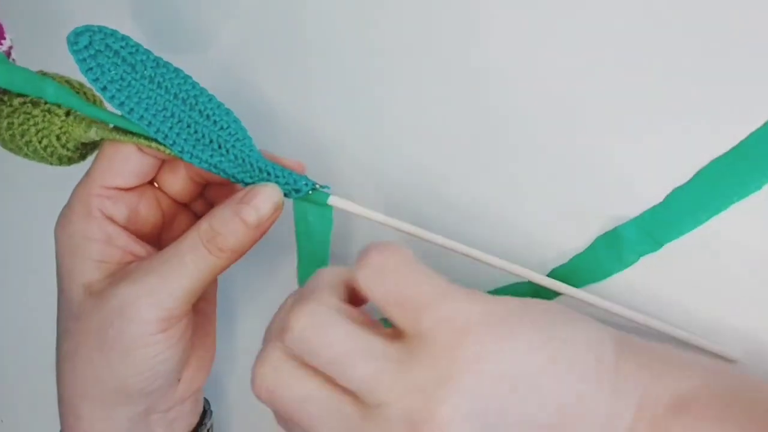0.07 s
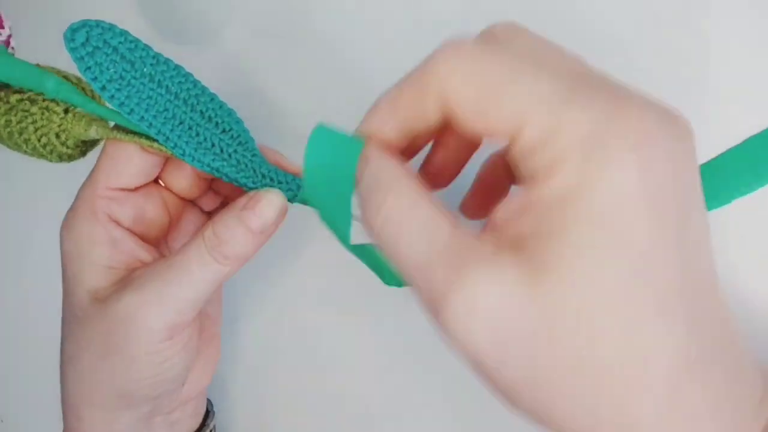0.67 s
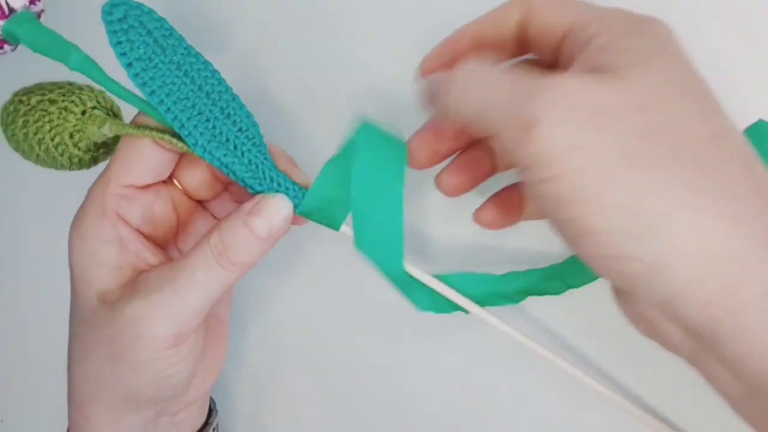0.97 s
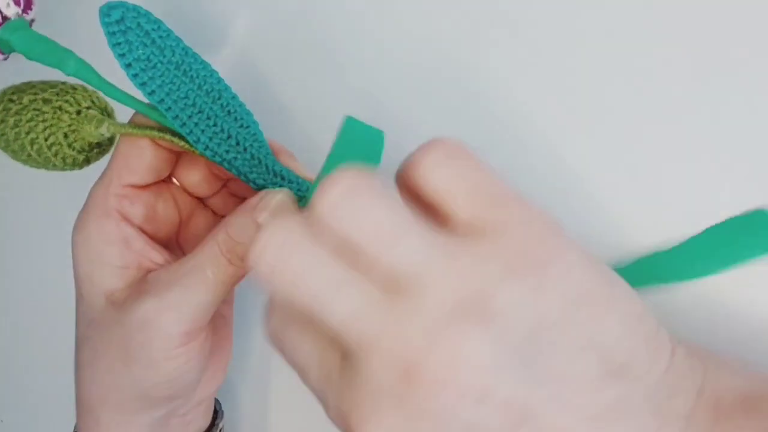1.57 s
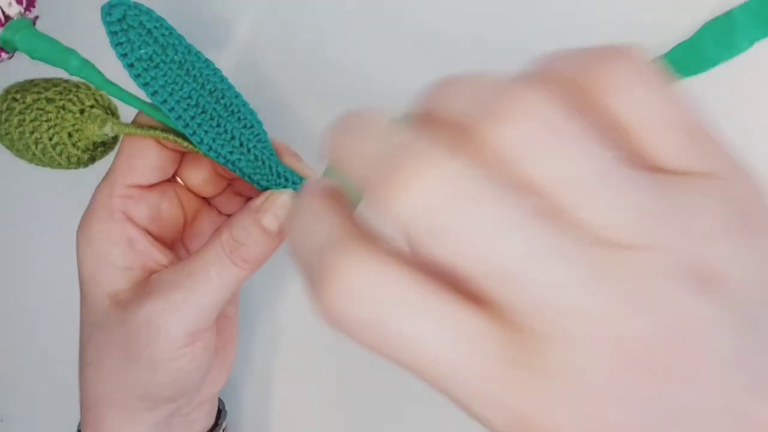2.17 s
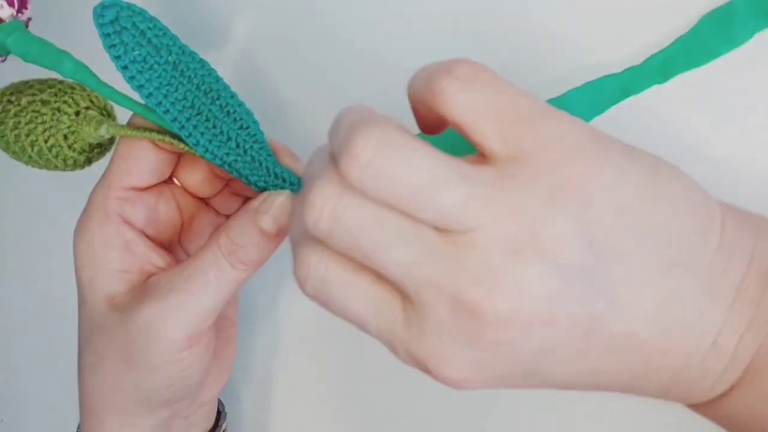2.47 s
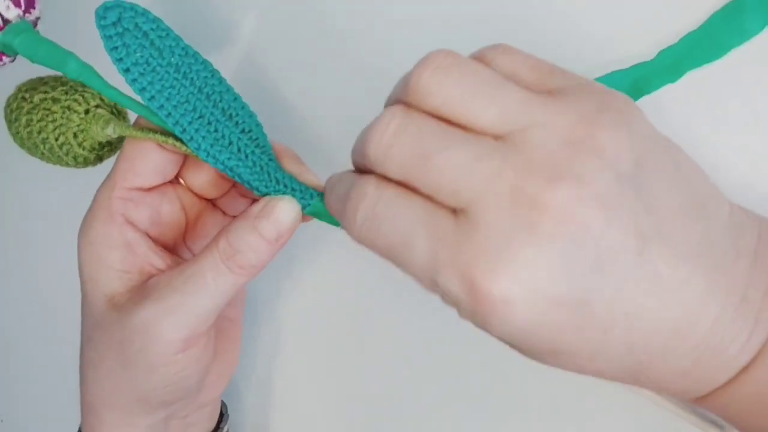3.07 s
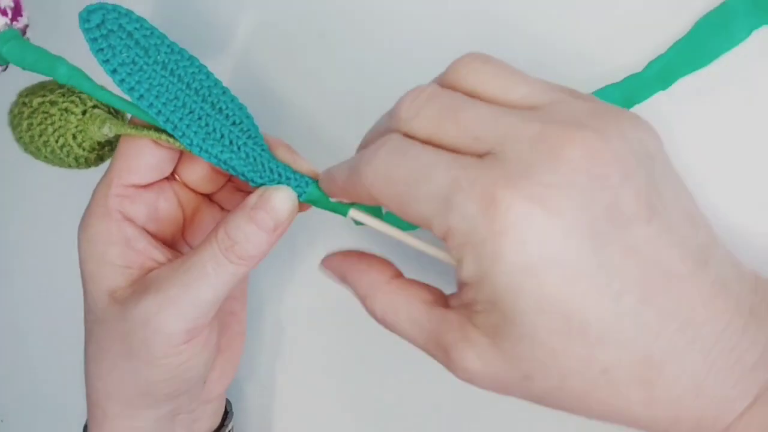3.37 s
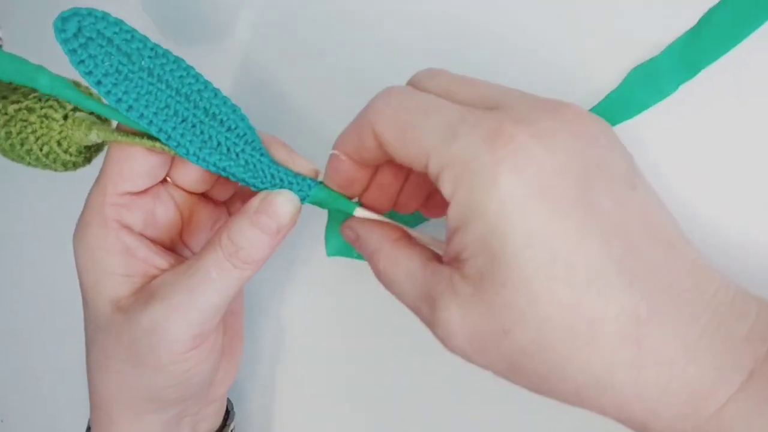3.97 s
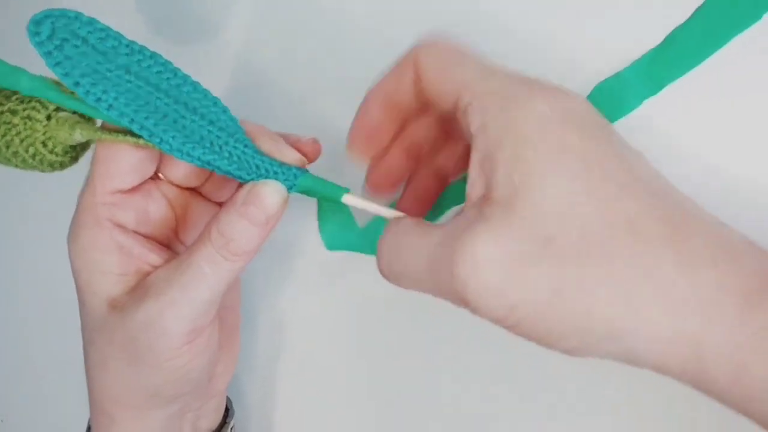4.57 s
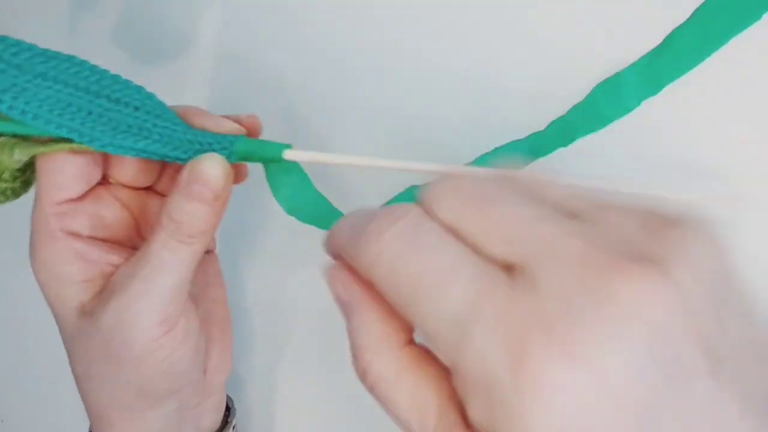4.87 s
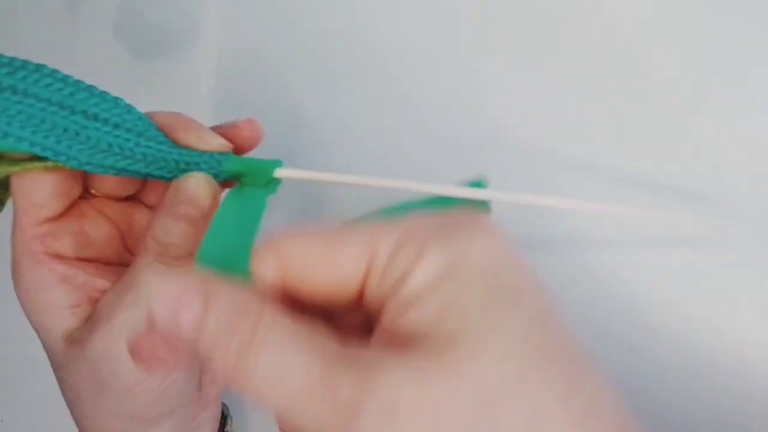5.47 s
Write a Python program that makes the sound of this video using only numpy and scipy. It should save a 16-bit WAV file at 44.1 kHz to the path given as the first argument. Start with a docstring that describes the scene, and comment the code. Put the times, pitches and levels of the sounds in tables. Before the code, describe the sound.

In a small room with a faint low hum, thin plastic tape crinkles in uneven bursts close to the microphone as it is wrapped around a stick. Scattered ticks build to a cluster of sharp snaps, then ease into gentler rustling, a soft hush of rubbing fingertips and dull hand shuffles. Finally the tape hangs loose and gives a busy, louder run of papery crackles and snaps.

```python
"""A small room, quietly rumbling and humming; a two-port microphone above a table.
Close to it, hands stretch thin plastic tape and wind it round a stick. Each short pull sets tiny
wrinkles crackling, creases buckle with sharp snaps, the edge skids off a finger, and fingertips rub
the tape smooth. Near the end the tape hangs free and its loose length rings like paper.
The walls answer briefly."""
import sys
import numpy as np
from scipy import signal
from scipy.fft import rfft, irfft, next_fast_len
from scipy.io import wavfile
from scipy.ndimage import uniform_filter1d, map_coordinates

SR = 44100
rng = np.random.default_rng(int(sys.argv[2]) if len(sys.argv) > 2 else 0)


def to_wav(s):
    """Save 16-bit WAV."""
    ch = np.atleast_2d(s).T  # columns
    pcm = np.round(np.clip(ch, -1, 1) * 32767)  # PCM
    wavfile.write(sys.argv[1], SR, pcm.astype(np.int16))


N = 246959

# hard or lone creases buckling: t/s, level/dB, body re level/dB, left-right/dB
SNAPS = [(0.003, -29, 2.5, 1), (0.321, -50.5, -18, -13), (0.6625, -21, -7.5, -12.5), (0.6667, -23, -5, -2),
         (0.794, -38, -10, -1), (0.8694, -34.5, -10, -5), (1.2768, -27.5, -8, -3), (1.313, -22, -27, 11),
         (1.3209, -20, -20, -1), (1.3262, -22, -32, -3), (1.3614, -17.5, -20, 10), (1.3826, -30, -9, 5),
         (1.429, -29, -19, 7), (1.5308, -14.5, -18, -20), (1.5341, -11.5, -17.5, -7.5),
         (1.5353, -9, -16, -6), (1.5379, -20, -11, -9), (1.9367, -40.5, -17, -9), (2.334, -32, -22, -8),
         (2.3729, -36, 5.5, -7), (2.934, -30, -29, 2), (3.481, -45, -6, -16), (3.7777, -40, -14, -16),
         (3.8382, -35.5, -17, -1), (4.311, -26, -16, -6), (4.4175, -38.5, -17, 1),
         (4.6058, -34.5, -2.5, 23), (4.9116, -36.5, -12, -4), (4.949, -23, -28, 15), (4.969, -24, -11, -2),
         (4.9949, -16.5, -9, -12.5), (5.006, -19, -23, -2), (5.016, -18.5, -10.5, -4),
         (5.0724, -29, -1.5, -15), (5.135, -28.5, -12.5, -12), (5.2875, -25.5, -22, 1),
         (5.3033, -26, -12, -5), (5.3111, -20.5, -16, -8), (5.3253, -14, -31, -1),
         (5.3382, -17.5, -6.5, -2), (5.3498, -19, -18, -12), (5.3616, -16, -22, 6), (5.367, -17, -14, -16),
         (5.3767, -22, -30, -20), (5.3897, -16, -16, -4), (5.4713, -26, -26, -9), (5.497, -15, -9, 13),
         (5.5149, -14.5, -17.5, -11), (5.5683, -17.5, -8, -5), (5.573, -9.5, -10.5, -8),
         (5.5809, -20, -5.5, 4), (5.5902, -17, -13, 1)]
# spectral shape of the taut film: f/Hz, level/dB
FILM_SPECTRUM = [(400, -13.5), (1600, -17.5), (2300, -9.5), (3600, -11.5), (4700, -6), (6000, -2),
                 (8500, -1), (10300, -11), (12300, -13), (15000, -22.5)]


def amp(db):
    return 10 ** (np.asarray(db) / 20)


def unit(x):
    return x / np.sqrt(np.mean(x ** 2) + 1e-20)


def pan(left_right_db):
    return amp(left_right_db * np.array([[.5], [-.5]]))


def along(points, hz):
    """Interpolate (f/Hz, value) points on a log axis."""
    f, v = np.transpose(points)
    return np.interp(np.log(hz + 1), np.log(f + 1), v)


def curves(rows):
    """One value per sample for each column after t/s."""
    s, *columns = np.transpose(rows)
    return np.array([np.interp(np.arange(N) / SR, s, column) for column in columns])


def wobble(knots_per_s):
    """Smooth random curve."""
    knots = rng.standard_normal(int(N * knots_per_s / SR) + 4)
    return map_coordinates(knots, [np.arange(N) * knots_per_s / SR])


def resonance(hz, centre_hz, width_hz):
    return 1j * hz * width_hz / (centre_hz ** 2 - hz ** 2 + 1j * hz * width_hz)


def filtered(x, response):
    """Apply the complex gain response(f/Hz)."""
    m = next_fast_len(N + SR // 2)
    return irfft(rfft(x, m) * response(np.fft.rfftfreq(m, 1 / SR)), m)[..., :N]


def coloured(x, spectrum, size=2048):
    """Causal unit-energy filter: a spectrum as the two resonant ports hear it."""
    # cavity behind each port, left then right: f/Hz, width/Hz, added peak/dB
    ports = [(8920, 1900, 3), (7380, 1230, 8.5)]
    hz = np.fft.rfftfreq(size, 1 / SR)
    cavity = np.array([1 + amp(db) / (1 + (2 * (hz - f) / width) ** 2) for f, width, db in ports])
    cepstrum = irfft(np.log(amp(along(spectrum, hz)) * cavity))
    cepstrum[:, 1:size // 2] *= 2  # fold to minimum phase
    cepstrum[:, size // 2 + 1:] = 0
    impulse = unit(irfft(np.exp(rfft(cepstrum)))) / np.sqrt(size)
    return signal.fftconvolve(np.broadcast_to(x, (2, N)), impulse, axes=1)[:, :N]


def hum_tone(centre_hz, drift_hz, flicker_db):
    """A sine wavering in level and pitch."""
    flicker = amp(flicker_db * wobble(14))
    hz = centre_hz + drift_hz * wobble(14)
    return unit(flicker * np.sin(2 * np.pi * np.cumsum(hz) / SR))


def background(rumble_db, lower_db, upper_db):
    """Room rumble and two hum tones about an octave apart, stronger on the left."""
    # rumble spectrum: f/Hz, level/dB
    rumble_spectrum = [(15, -1), (27, 5), (38, -8.5), (80, -8), (125, -10), (175, -2.5), (300, -12),
                       (550, -14), (1200, -24.5), (2700, -32.5), (5300, -38.5), (8000, -32), (11000, -48),
                       (15000, -68.5)]
    # likeness of the sides: f/Hz, correlation (capped at 1)
    likeness = [(60, 0.9), (130, 1.5), (300, 0.5), (700, 0), (1500, 0)]
    # balance: f/Hz, left-right/dB
    balance = [(200, 6), (600, 7), (2000, -0.5), (10000, -1.5)]
    # hum: t/s, lower tone/dB, upper tone/dB
    hum_levels = [(0.0, -50, -51), (0.6, -53, -45.5), (1.5, -49.5, -55), (3.0, -51, -55.5),
                  (3.6, -43.5, -53.5), (4.95, -45, -51), (5.6, -57, -57.5)]

    def mid_side(hz):
        angle = np.arccos(np.clip(along(likeness, hz), -1, 1)) / 2
        return amp(along(rumble_spectrum, hz)) * [np.cos(angle), np.sin(angle)]

    mid, side = filtered(rng.standard_normal((2, N)), mid_side)
    rumble = amp(rumble_db) * unit(np.array([mid + side, mid - side]))
    lower, upper = curves(hum_levels)
    hum = amp(lower + lower_db) * hum_tone(centre_hz=53.0, drift_hz=3.5, flicker_db=4.5)
    hum += amp(upper + upper_db) * hum_tone(centre_hz=109.8, drift_hz=6, flicker_db=4)
    return filtered(rumble + hum, lambda hz: pan(along(balance, hz)))


def room(x, onset_s=0.0022):
    """The walls answer a few milliseconds late; each frequency dies at its own rate."""
    # reverberation: f/Hz, t60/s
    decay = [(300, 0.44), (1300, 0.08), (3500, 0.29), (9000, 0.22), (15000, 0.425)]
    hz, t, noise = signal.stft(rng.standard_normal((2, SR // 2)), SR, nperseg=256)
    envelope = amp(-60 * t / along(decay, hz)[:, None]) * (1 - np.exp(-t / onset_s))
    tail = signal.istft(noise * envelope, SR, nperseg=256)[1]
    return signal.fftconvolve(x, tail / np.linalg.norm(tail[0]), axes=1)[:, :N]


def fingers(rub_db, uneven_db, grip_db, holding_db, swell_s=0.018):
    """Fingertips rub the wound tape with an uneven hush; the hands shuffle dully, more at each grip."""
    # fingertips pressing along the stick: t/s, level/dB
    rub_levels = [(2.85, -80), (2.95, -60), (3.04, -53), (3.12, -50), (3.22, -53), (3.35, -58), (3.6, -62),
                  (4.0, -66), (4.5, -80)]
    # soft rubbing hush: f/Hz, level/dB
    hush_spectrum = [(300, -11), (500, 6), (1000, -2), (1600, -2), (2500, 2), (3600, -7.5), (5500, -3),
                     (8500, -12), (11000, -46), (15000, -45)]
    # grip shifts: t/s, level/dB
    grips = [(0.0, -37), (0.238, -48), (1.56, -53), (1.71, -42), (1.96, -39.5), (2.39, -40), (4.23, -37.5),
             (4.41, -44), (5.01, -38.5), (5.13, -38), (5.35, -38.5), (5.51, -40), (5.585, -42)]
    # shuffling palms: f/Hz, level/dB
    palm_spectrum = [(60, -22.5), (170, 3.5), (280, -1.5), (520, -7.5), (900, -24), (2000, -28.5),
                     (6000, -66.5)]
    t = np.arange(N) / SR
    rub = coloured(rng.standard_normal((2, N)), hush_spectrum)
    rub *= amp(curves(rub_levels) + rub_db + uneven_db * wobble(25.16))
    shuffle = amp(holding_db) + sum(amp(db) * np.exp(-np.abs(t - s) / swell_s) for s, db in grips)
    grip = coloured(rng.standard_normal(N), palm_spectrum) * shuffle * amp(grip_db) * pan(4)
    return rub + grip


def loose_length(tape, free_s, centre_hz, width_hz, gain_db):
    """Once the tape hangs free, its sounds also ring one resonance of the loose length."""
    free = np.clip((np.arange(N) / SR - free_s) / .02, 0, 1)
    return amp(gain_db) * filtered(tape * free, lambda hz: resonance(hz, centre_hz, width_hz))


def skids(rough_db, rise_s=0.0077):
    """The tape's edge catches, then slips off a finger with a short rasp."""
    # slips: t/s, level/dB, t60/s
    slips = [(0.663, -50, 0.045), (0.868, -49, 0.42), (1.275, -39, 0.49), (1.697, -43, 0.082),
             (2.55, -31, 0.11), (4.601, -32, 0.057)]
    # rasping edge: f/Hz, level/dB
    edge_spectrum = [(1200, -26), (2300, -34.5), (2800, 4.5), (4000, -3), (6300, 0), (8000, -12.5),
                     (11000, -22), (15000, -30.5)]
    t = np.arange(N) / SR
    envelope = sum(amp(db - 60 * np.abs(t - s) / t60) * np.clip((t - s) / rise_s, 0, 1)
                   for s, db, t60 in slips)
    rasp = unit(rng.standard_normal((2, N)) * amp(rough_db * wobble(500)))
    return coloured(envelope * rasp, edge_spectrum)


def pulling(settle_db_per_s):
    """Envelopes of bright crackle and deeper rustle: each pull speeds up, runs on and lets go."""
    # pulls: t/s, rise/s, hold/s, crackle/dB, rustle re crackle/dB
    pulls = [(0.0, 0.001, 0.005, -33.5, -3.5), (0.31, 0.012, 0.11, -61, -2), (0.446, 0.13, .04, -46.5, -12),
             (0.658, 0.0021, 0.007, -26, -19), (0.727, 0.012, 0.0049, -44, -20),
             (0.863, 0.0058, 0.078, -43, -8), (1.111, 0.0089, 0.024, -51.5, -4),
             (1.17, 0.023, 0.02, -44, -2.5), (1.272, 0.0054, 0.091, -29, -12),
             (1.415, 0.032, 0.054, -37.5, -18), (1.52, 0.0058, 0.074, -39, -6),
             (1.693, 0.0093, 0.0077, -32, -5), (1.825, 0.0041, 0.016, -48, -12),
             (1.945, 0.0056, 0.039, -54.5, 0.5), (2.261, 0.088, 0.014, -32.5, -9.5),
             (2.455, 0.015, 0.0034, -55.5, 6.5), (2.549, .005, 0.014, -40, -16),
             (2.648, 0.018, 0.072, -53, -4), (2.901, 0.095, 0.01, -38, -14), (3.012, 0.017, 0.13, -63, 14),
             (3.243, 0.12, .05, -47, -8), (3.476, 0.012, 0.0067, -40, -10), (3.53, 0.1, .07, -51, -14),
             (3.681, 0.023, 0.0084, -44, -25), (3.77, .005, 0.13, -50, -6), (3.97, 0.043, .08, -48.5, -6),
             (4.183, 0.024, .01, -48, -6.5), (4.309, 0.0061, 0.011, -39.5, -6.5),
             (4.4, .008, .015, -47.5, -7), (4.538, 0.071, 0.0091, -43, -8), (4.921, 0.011, 0.016, -24, -19),
             (4.996, 0.0046, 0.055, -29, -2.5), (5.104, 0.044, 0.012, -34.5, -13),
             (5.269, 0.068, 0.051, -24, -9), (5.464, 0.0062, 0.037, -30.5, -25),
             (5.563, 0.0044, .04, -17, -16)]
    t = np.arange(N) / SR
    taut, slack = np.full((2, N), 1e-5)
    for s, rise_s, hold_s, db, rustle_db in pulls:
        span = slice(max(int(s * SR), 0), int((s + 1) * SR))
        age_s = t[span] - s
        settling_s = np.maximum(age_s - rise_s - hold_s, 0)
        stroke = np.clip(age_s / rise_s, 0, 1) * amp(db - settle_db_per_s * settling_s)
        taut[span] = np.hypot(taut[span], stroke)
        slack[span] = np.hypot(slack[span], stroke * amp(rustle_db))
    return taut, slack


def sticking(hard_db=-22, run_gap_s=.04, dip_db=-11, lead_s=.008):
    """Sliding gain: the tape sticks and goes quiet just before a run of hard creases gives way."""
    t = np.arange(N) / SR
    hard_s = np.sort([s for s, db, *_ in SNAPS if db > hard_db])
    starts_s = hard_s[np.diff(hard_s, prepend=-1) > run_gap_s]
    wait_s = np.append(starts_s, np.inf)[np.searchsorted(starts_s, t)] - t
    return amp(dip_db * np.exp(-wait_s / lead_s))


def flexing(x, depth_db, bins, frames):
    """The film's resonances wander as it bends: random patches of gain in frequency and time."""
    spectra = signal.stft(x, nperseg=512)[2]
    patches = uniform_filter1d(rng.standard_normal(spectra.shape[1:]), bins, axis=0)
    patches = uniform_filter1d(patches, frames, axis=1)
    return unit(signal.istft(spectra * amp(depth_db * unit(patches)), nperseg=512)[1][:, :N])


def buckle(t, life_s, echo_s, echo_db, flutter_db, flutter_t60_s):
    """One crease gives way: a short burst, its echo off the table and the flutter of loose film."""
    burst = np.exp(-t / life_s)
    echo = amp(echo_db) * (t > echo_s) * np.exp(-np.abs(t - echo_s) / life_s)
    flutter = amp(flutter_db - 60 * t / flutter_t60_s)
    envelope = np.sqrt(burst ** 2 + echo ** 2 + flutter ** 2)
    return unit(rng.standard_normal((2, len(t))) * envelope) * np.sqrt(np.mean(envelope ** 2))


def crackle(taut, slack, crackle_db, rustle_db, flicks_per_s, spread_db, pan_db):
    """Tiny wrinkles flick at random over a soft hiss as the tape slides; slack tape rustles lower."""
    # slack tape: f/Hz, level/dB
    slack_spectrum = [(250, -20), (500, -14), (750, -0.5), (1020, 2), (1500, -9), (2050, -2.5),
                      (2550, -10.5), (3100, -5.5), (3700, -2.5), (4700, -1.5), (7000, -6), (12000, -35.5)]
    t = np.arange(SR // 50) / SR
    hits = rng.random((4, N)) < flicks_per_s / SR / 4
    flicks = hits * amp(spread_db * np.minimum(rng.exponential(size=(4, N)), 3))
    wrinkles = np.zeros((2, N))
    for train in flicks:
        click = buckle(t, life_s=0.00073, echo_s=rng.uniform(0.0012, 0.0043), echo_db=-5,
                       flutter_db=-26.5, flutter_t60_s=0.018)
        wrinkles += signal.fftconvolve(train[None], click, axes=1)[:, :N]
    hiss = rng.standard_normal((2, N))
    grain = sticking() * flexing(unit(wrinkles) + hiss, depth_db=4.5, bins=5, frames=8)
    bright = coloured(grain * taut * amp(crackle_db) * pan(pan_db), FILM_SPECTRUM)
    return bright + coloured(grain * slack * amp(rustle_db), slack_spectrum)


def small_creases(taut, count, per_s, over_pull_db, cap_db, spread_db, body_db, pan_db):
    """Small creases buckle by chance, as hard as the pull, up to a cap; columns as in SNAPS."""
    gap, size, side = rng.random((count, 3)).T
    times_s = np.cumsum(2 * gap) / per_s
    pull_db = 20 * np.log10(np.interp(times_s * SR, np.arange(N), taut))
    level_db = np.minimum(pull_db + over_pull_db, cap_db) + spread_db * (2 * size - 1)
    return np.transpose([times_s, level_db, np.full(count, body_db), pan_db + (2 * side - 1)])


def facets(x, width_hz, ring_db, count=5):
    """The stiff facets beside a crease ring briefly, each at a chance pitch."""
    hz = np.fft.rfftfreq(x.shape[1], 1 / SR)
    centres_hz = np.exp(rng.uniform(np.log(2300), np.log(12000), (count, 1)))
    rings = resonance(hz, centres_hz, width_hz).sum(0)
    return unit(irfft(rfft(x) * (1 + amp(ring_db) * rings), x.shape[1])) * x.std()


def snaps(creases, snap_db, body_db, pan_share, pan_bias):
    """Creases snap one by one and jolt the band of tape."""
    # jolted band: f/Hz, level/dB
    body_spectrum = [(120, -29), (350, -2), (560, -0.5), (1000, 2.5), (1350, -2.5), (1650, 2.5),
                     (2500, 0.5), (3800, -9), (8000, -29.5)]
    t = np.arange(next_fast_len(SR // 16)) / SR
    film, body = np.zeros((2, 2, N + SR))
    for s, db, jolt_db, pan_db in creases:
        # a hard crease cracks dry, a gentle one crumples on
        crumple_db = np.interp(db, [-40, -15], [-5, -14])
        crack = buckle(t, life_s=.001, echo_s=rng.uniform(.001, .0018), echo_db=-2,
                       flutter_db=crumple_db, flutter_t60_s=.042)
        sides = pan(pan_share * (pan_db + pan_bias))
        # long waves reach both ports alike, the left 0.2 ms later
        jolt = np.array([np.roll(crack[0], round(.0002 * SR)), crack[0]])
        at = min(round(s * SR), N)
        film[:, at:at + len(t)] += amp(db + snap_db) * sides * facets(crack, width_hz=82, ring_db=6.5)
        body[:, at:at + len(t)] += amp(db + jolt_db + body_db) * jolt
    return coloured(film[:, :N], FILM_SPECTRUM) + coloured(body[:, :N], body_spectrum)


def scene():
    """Tape and fingers, their room and its background."""
    taut, slack = pulling(settle_db_per_s=270)
    small = small_creases(taut, count=180, per_s=24, over_pull_db=2, cap_db=-33.5, spread_db=3.5,
                          body_db=-9, pan_db=-10)
    tape = snaps(np.vstack([SNAPS, small]), snap_db=3.5, body_db=3.5, pan_share=0.66, pan_bias=-1.0)
    tape += skids(rough_db=2.5)
    tape += crackle(taut, slack, crackle_db=-0.44, rustle_db=-2.5, flicks_per_s=500, spread_db=1.5,
                    pan_db=-1.0)
    tape += loose_length(tape, free_s=5.25, centre_hz=2650, width_hz=200, gain_db=1)
    direct = tape + fingers(rub_db=5.0, uneven_db=2.0, grip_db=-4.5, holding_db=-51.5)
    return direct + amp(-14.0) * room(direct) + background(rumble_db=-45.5, lower_db=-0.5, upper_db=-1.0)


def record(dry):
    """Clip at full scale, then low-pass steeply."""
    top_hz = 15250
    return filtered(np.clip(dry, -1, 1), lambda hz: 1 / (1 + (hz / top_hz) ** 100))


dry = scene()
out = record(dry)
to_wav(out)
```